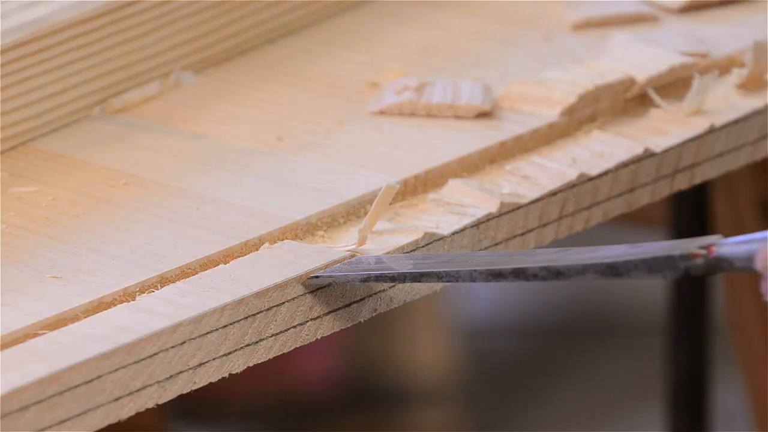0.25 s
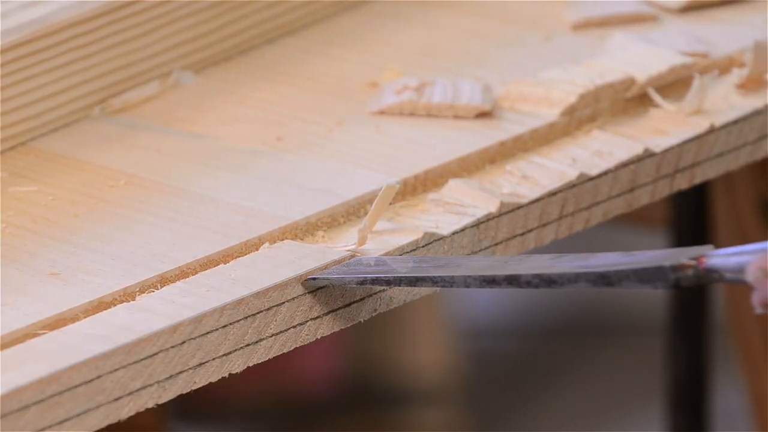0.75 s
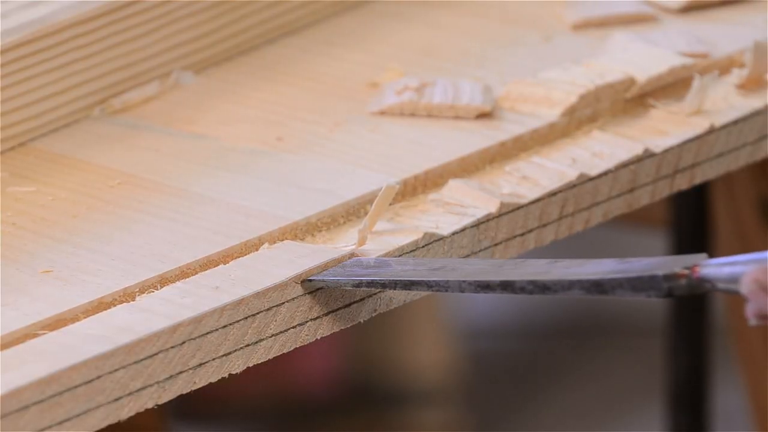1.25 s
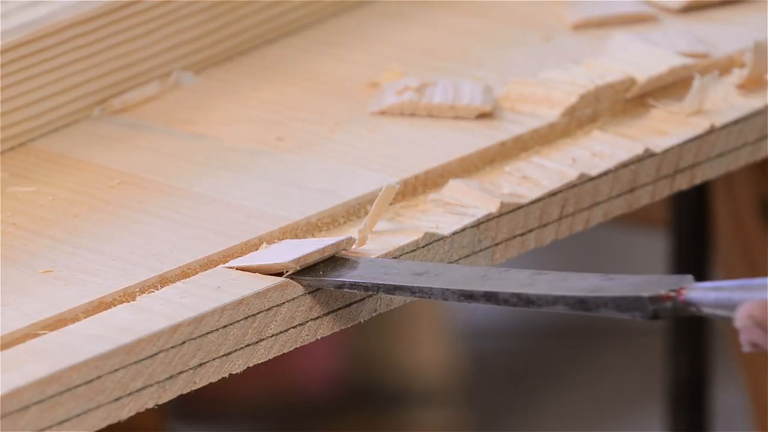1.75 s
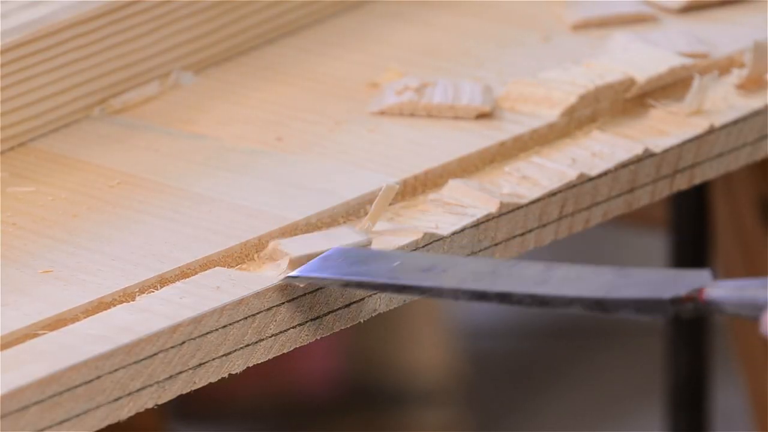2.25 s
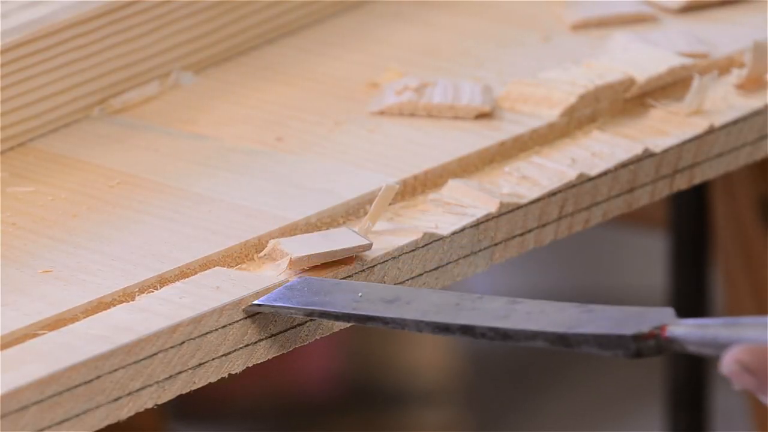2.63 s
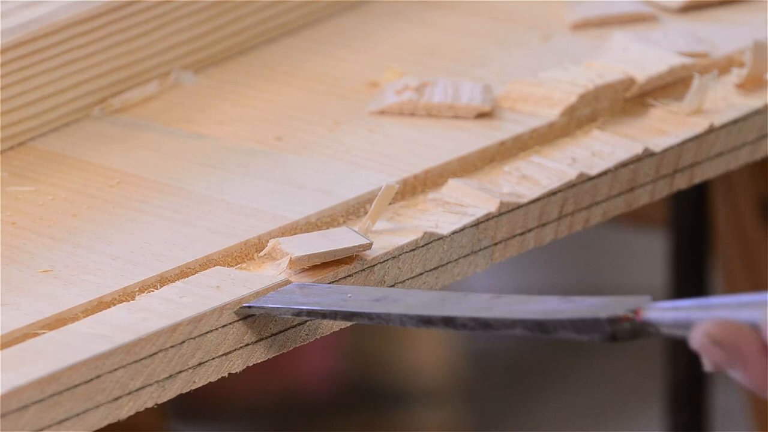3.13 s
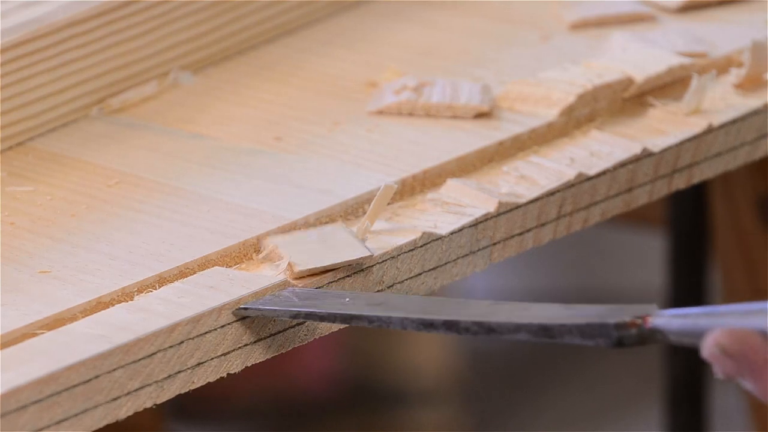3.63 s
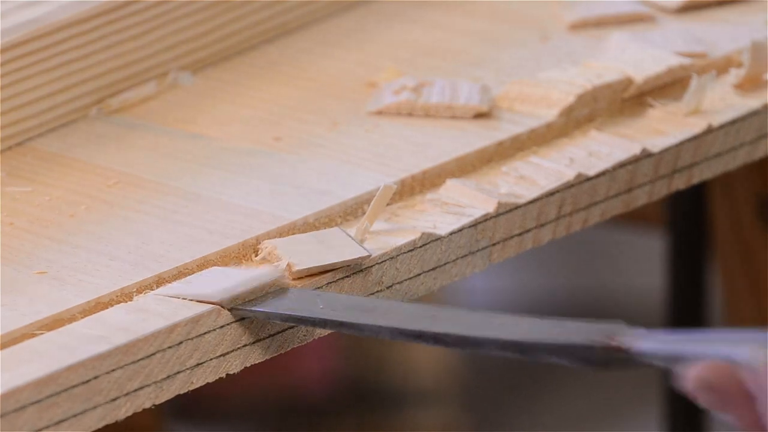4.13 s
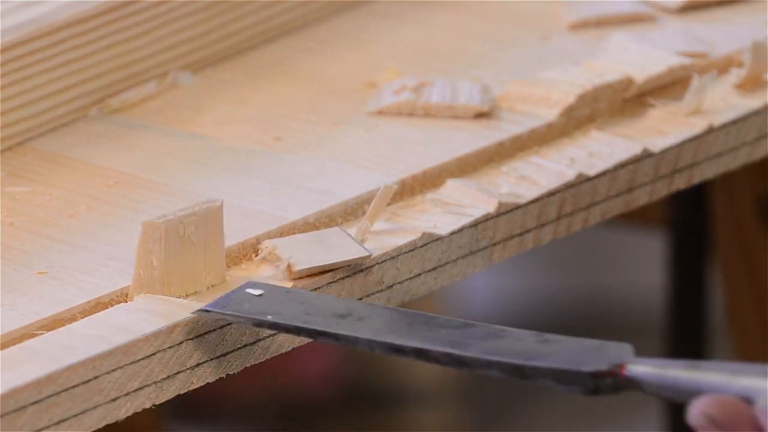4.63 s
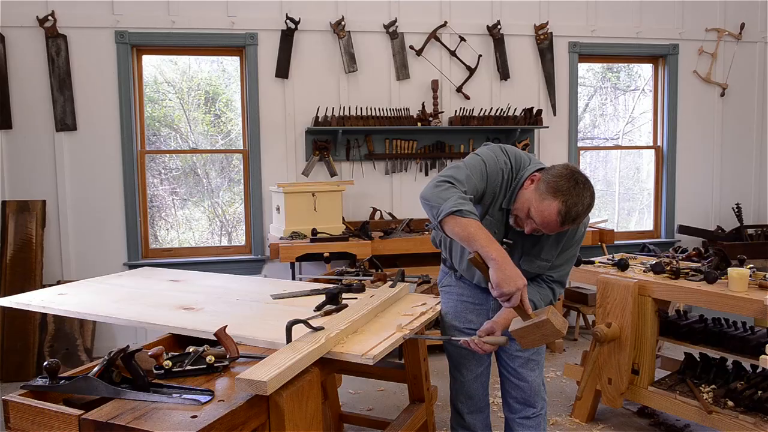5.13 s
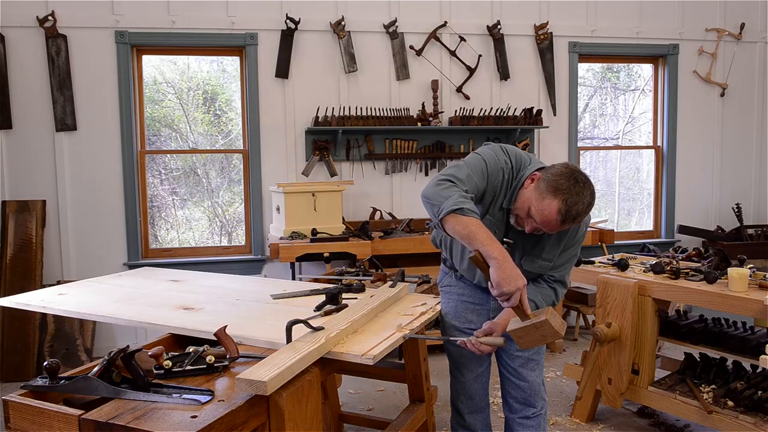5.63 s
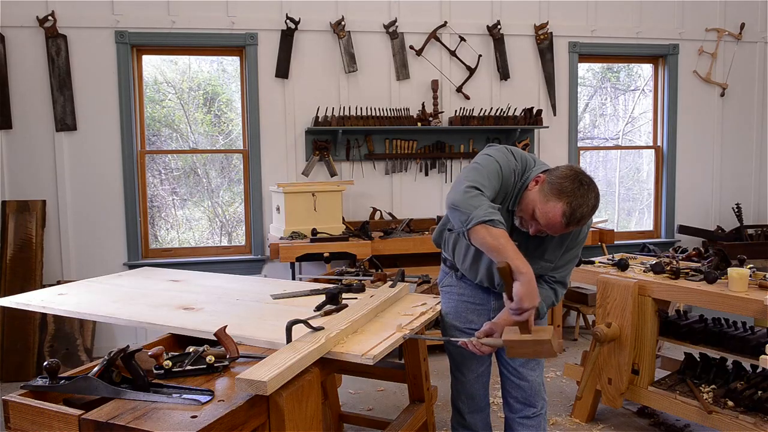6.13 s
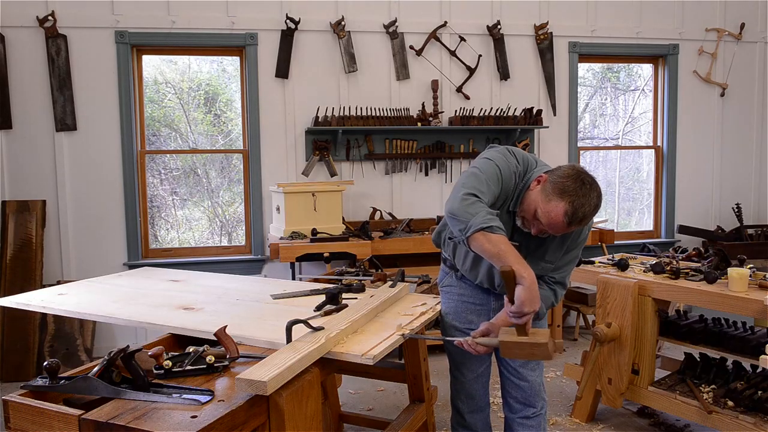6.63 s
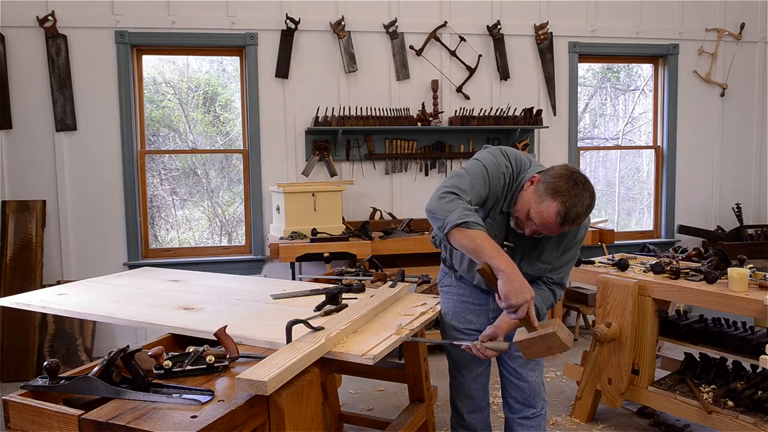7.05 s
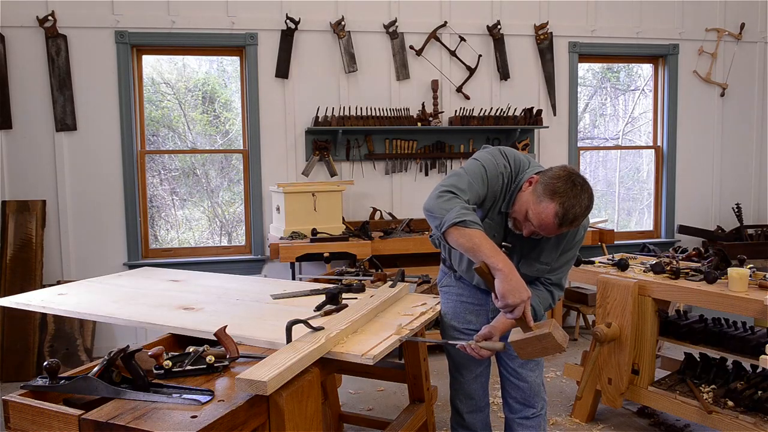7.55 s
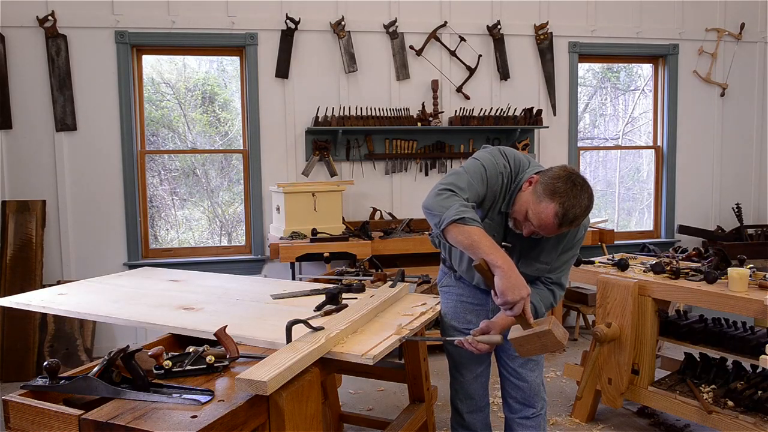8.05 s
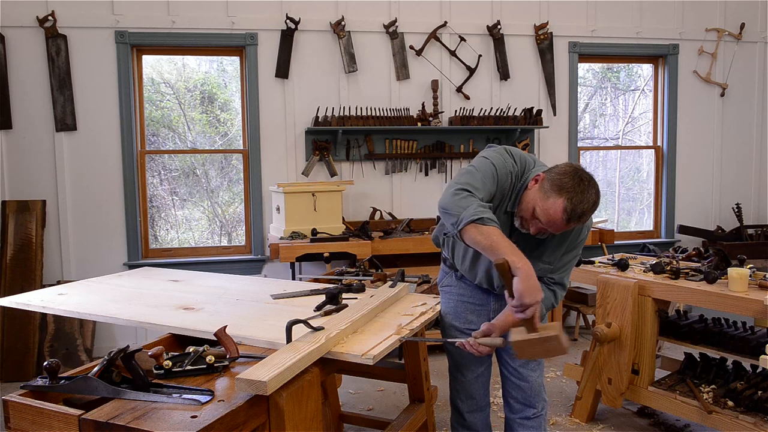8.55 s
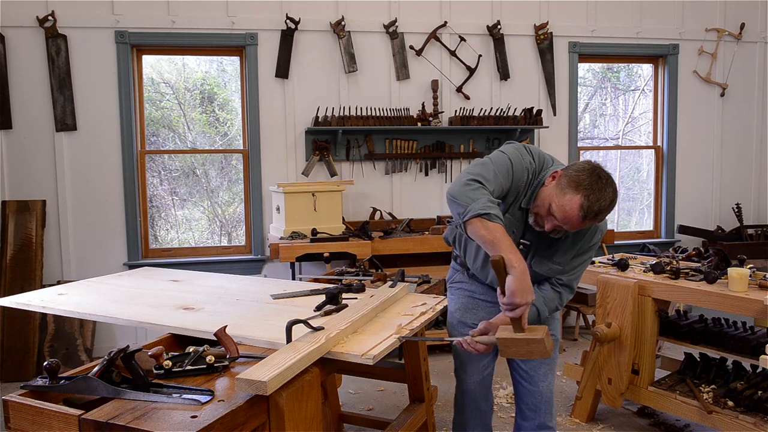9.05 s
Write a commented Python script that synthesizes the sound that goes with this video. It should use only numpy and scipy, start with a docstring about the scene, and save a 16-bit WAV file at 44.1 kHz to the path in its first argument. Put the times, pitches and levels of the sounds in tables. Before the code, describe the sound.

Sharp mallet blows on a chisel echo around a workshop, while the blade scrapes and splits off wood chips between runs.

```python
"""Mallet and chisel in a workshop

A wooden mallet drives a chisel along the edge of a board in runs of blows. Each blow cracks, rings the
board, bench and tools, and echoes round the room; the loudest overload the recorder. Between runs the
blade slides and levers off chips, fibres snap and tear, and sleeves rustle. Lamps hum, and a few gusts
of air buffet the microphone, mostly on the right."""
import sys
import numpy as np
from scipy import signal
from scipy.fft import rfft, irfft
from scipy.io import wavfile

SR = 44100
rng = np.random.default_rng(int(sys.argv[2]) if len(sys.argv) > 2 else 0)


def log_audio(samples):
    """Write samples as a 16-bit WAV file to the path given in sys.argv[1]."""
    # one column per channel
    frames = np.atleast_2d(samples).T
    # limit to full scale, then quantise
    limited = np.clip(frames, -1, 1)
    pcm = np.round(limited * 32767).astype(np.int16)
    wavfile.write(sys.argv[1], SR, pcm)


N = 410130

# Mallet blows and rebounds. Each row: start in seconds, strength in dB, lean towards the steel in dB
# per part, extra board boom in dB, extra mallet-head knock in dB, extra crack in dB, the crack's
# treble tilt in dB, level of tearing fibres in dB.
BLOWS = [(0.4001, -12, -0.5, 1.5, -6.5, -5.5, -8.5, -63), (0.4576, -23.5, 1.5, 0.5, -3, -10, -8.5, -74.5),
         (.7320, -7.5, 0, 0.5, -4, -9.5, 3.5, -52.5), (0.9697, -5, 0, 5, -5, -7, -6.5, -51.5),
         (1.1973, -5, 0.94, 1, -3, -4.5, 2, -50), (1.4309, -8.5, -0.3, -3.5, 1.5, 7.5, 7, -53.5),
         (1.6624, -12, 1.5, -0.5, -5, -2.5, -10.5, -67), (1.8861, -14.5, -2.2, -4, 0, -2, -2, -63),
         (3.6300, -8.5, 1.5, 3.5, -.5, -7, -9.5, -60), (3.9180, -9.5, 1.4, 2, 3, 1, 10.5, -49),
         (4.1730, -13.5, 4, 4.5, 6, -5.5, -18.5, -68), (6.1275, -5.5, 4, 1.5, 3.5, -2, -14, -47.5),
         (6.4098, -9.5, 1, -4, -0.5, 5, 1.5, -48), (6.6374, -18.5, -1.5, -3, 2, 5.5, 5, -64),
         (6.6487, -21, 0, -6, -9, -5, -1, -71), (8.4275, -18, -0.64, 0, -0.5, -12, -2, -68.5),
         (8.7714, -5, 3.5, -2, 7, -4.5, -18, -49.5), (9.0328, -8, 0.2, -7, -5, -11, -9, -82)]
# The tones of the board and bench. Each row: pitch in Hz, level in dB, seconds to fade by 60 dB.
BOARD = [(123, -12.5, 0.054), (167.7, -12, 0.21), (248.1, 1.5, 0.082), (291, -4, 0.063), (336.3, 0.5, 0.11),
         (394, -7.5, 0.17), (429, -7, 0.16)]
# The tones of the chisel's handle, with the same columns.
HANDLE = [(730, 0, 0.055), (814, -1, 0.043), (927.4, -5, 0.05), (1051, -5, .04)]
# The tone colour of a crack. Each row: frequency in Hz, level in dB.
CRACK = [(2000, -6), (3300, -3), (5000, -7.5), (7000, -5.5), (9500, -7.5), (12000, -15), (16000, -14.5)]


def amp(db):
    return 10 ** (np.asarray(db) / 20)


def rms_one(x):
    return x / np.sqrt(np.mean(x ** 2) + 1e-20)


def at_hz(rows, hz, column=1):
    """Reads between a table's rows, with frequency counted in octaves."""
    rows = np.array(rows)
    return np.interp(np.log(np.maximum(hz, 1)), np.log(rows[:, 0]), rows[:, column])


def envelope(spells, rise_db_per_s, fall_db_per_s):
    """Each spell of sound swells in before its start, holds, then dies away."""
    t = np.arange(N) / SR
    return sum(amp(db - rise_db_per_s * np.maximum(start - t, 0)
                   - fall_db_per_s * np.maximum(t - start - length, 0)) for start, length, db in spells)


def clicks(times, sizes):
    out = np.full(N, 1e-18)
    out[np.round(np.asarray(times) * SR).astype(int)] = sizes
    return out


def dying(times, levels_db, fade_s):
    """A loudness curve that jumps at each time, then falls 60 dB in fade_s."""
    return signal.lfilter([1], [1, -amp(-60 / (fade_s * SR))], clicks(times, amp(levels_db)))


def coloured(x, colour):
    """Gives a sound a tone colour; white noise keeps its power."""
    gain = amp(at_hz(colour, np.arange(N // 2 + 1) * SR / N))
    return irfft(rfft(x) * rms_one(gain), N)


def drift(turns_per_s):
    """A curve that wanders at random around zero."""
    knots = rng.standard_normal(int(turns_per_s * N / SR) + 2)
    return np.interp(np.linspace(0, len(knots) - 1, N), np.arange(len(knots)), knots)


def late_left(pair, samples=2):
    return np.array([np.roll(pair[0], samples), pair[1]])


def tilted(make, levels_db, tilt_db):
    """Makes a sound at two levels, tilt_db apart, and blends from one to the other around 6500 Hz."""
    lower, upper = make(levels_db - tilt_db / 2), make(levels_db + tilt_db / 2)
    return lower + signal.lfilter(*signal.butter(1, 6500, "high", fs=SR), upper - lower)


def struck(tones, times, levels_db, contact_ms, spread_db, damping=1):
    """Every hit rings each tone with its own strength; a longer contact lets the ring swell in."""
    out, chance = np.zeros(N), rng.standard_normal((len(times), len(tones)))
    sides = rng.choice([-1, 1], chance.shape)   # the first push depends on where the hit lands
    for k, (hz, db, fade_s) in enumerate(tones):
        turn = np.exp(2j * np.pi * hz / SR)
        decay = amp(-60 * damping / (fade_s * SR))
        swell = np.exp(-1000 / (contact_ms * SR))
        hits = clicks(times, amp(levels_db + db + spread_db * chance[:, k]) * sides[:, k] * damping ** .5)
        feedback = np.convolve([1, -decay * turn], [1, -swell * turn])
        out += signal.lfilter([1 - swell], feedback, hits).imag
    return out


def background():
    """The room rumbles unevenly under the steady hum of the lamps."""
    # The colour of the room's noise. Each row: frequency in Hz, level in dB.
    colour = [(15, -1.5), (25, 6), (60, -2), (126, -9.5), (170, -14.5), (360, -15), (500, -17.5),
              (700, -29.5), (1600, -27.5), (2600, -34.5), (11600, -42.5), (16000, -48)]
    # The lamps' tones. Each row: pitch in Hz, level in dB.
    lamp_tones = [(118.4, -68), (242.2, -80.5), (360.7, -70.5), (479.1, -75.5), (602.9, -84.5),
                  (839.8, -88.5), (1443, -89), (1561, -93.5), (1680, -88.5), (1922, -102.5)]
    noise = rng.standard_normal((3, N))
    rumble = rms_one(coloured(noise[0] + 0.65 * noise[1:], colour)) * amp(-59.5 + 2.5 * drift(6.7))
    t = np.arange(N) / SR
    hum = sum(np.sqrt(2) * amp(db) * np.sin(2 * np.pi * (hz * t + rng.random())) for hz, db in lamp_tones)
    return rumble + hum


def air_buffet():
    """Air hitting the right microphone opening makes lumpy low noise, much weaker on the left."""
    # Gusts of air. Each row: start in seconds, length in seconds, level in dB.
    gusts = [(0.0, 0.013, -28.5), (.3, 0.11, -34), (2.08, 0.14, -28.5)]
    low = signal.sosfilt(signal.butter(2, [15, 85], "band", fs=SR, output="sos"),
                         rng.standard_normal((2, N)))
    loudness = envelope(gusts, rise_db_per_s=248, fall_db_per_s=134)
    return loudness * rms_one(low * amp(2.5 * drift(18))) * amp([[-5.0], [4.5]])


def workshop_echo(x):
    """Countless reflections blend into noise that dies away at its own pace in each band."""
    # The room's echo. Each row: frequency in Hz, seconds to fade by 60 dB, level in dB,
    # how alike left and right are from 0 to 1.
    room = [(59, 0.35, -10.5, .95), (164, 0.82, 1, 1), (290, 1.05, -1, .99), (464, 1.0, -7, .98),
            (1100, 1.096, -3, 0.93), (2160, 1.09, -5, 0.93), (3980, 1.066, -8, 0.15),
            (6500, 0.3, -2.5, 0.18), (9800, 0.21, -5.5, 0.31), (15000, 0.24, -9.5, .3)]
    t = np.arange(2 * SR) / SR
    response = np.zeros((2, len(t)))
    edges_hz = 40 * 2 ** np.arange(0, 9.1, .5)
    for low, high in zip(edges_hz, edges_hz[1:]):
        fade_s, db, alike = (at_hz(room, np.sqrt(low * high), column) for column in (1, 2, 3))
        band = signal.butter(2, [low, high], "band", fs=SR, output="sos")
        mid, side = signal.sosfilt(band, rng.standard_normal((2, len(t))))
        pair = np.sqrt(1 + alike) * mid + np.sqrt(1 - alike) * side * [[1], [-1]]
        response += amp(db - 60 * t / fade_s) * pair
    response *= 1 - np.exp(-t / 0.0027)   # the first reflections build up
    return amp(-33) * signal.fftconvolve(x[None], response, axes=1)[:, :N]


def rubbing(loudness, colour):
    """Rubbing makes dense, uneven grains of noise, partly alike left and right."""
    grains = rng.standard_normal((3, N)) * amp(1.5 * (drift(360) + .7 * drift(44)))
    return loudness * rms_one(coloured(grains[0] + 0.25 * grains[1:], colour))


def rustling_and_tearing():
    """Sleeves and chips rustle, and fibres go on tearing after each blow, with the same crisp noise."""
    # Rustles. Each row: start in seconds, length in seconds, level in dB.
    rustles = [(1.9, 0.036, -61), (2.0, 0.18, -70), (2.72, .08, -76), (3.15, 0.056, -75),
               (3.82, 0.55, -56.5), (5.3, 0.022, -76.5), (5.46, .1, -75.5), (5.85, 0.35, -70),
               (8.07, 0.041, -70.5), (8.68, 0.059, -67.5), (9.1, .03, -76), (9.21, 0.13, -56.5)]
    # Their colour. Each row: frequency in Hz, level in dB.
    colour = [(2500, -16.5), (5000, -1), (8000, -3), (11000, -2), (16000, -10.5)]
    times, tear_db = np.transpose(BLOWS)[[0, 7]]
    tearing = dying(times, tear_db, fade_s=60 / 45)   # falls 45 dB a second
    return rubbing(envelope(rustles, rise_db_per_s=123, fall_db_per_s=156.5) + tearing, colour)


def blade_slides():
    """The blade scrapes softly as it slides over the wood."""
    # Strokes of the blade. Each row: start in seconds, length in seconds, level in dB.
    strokes = [(.03, 0.33, -56.5), (2.45, 0.18, -60), (2.7, 0.19, -55.5), (3.05, 0.21, -64),
               (4.95, 0.28, -59.5), (5.3, 0.18, -69), (5.86, 0.3, -64.5), (7.3, 0.17, -64),
               (8.06, 0.035, -70), (8.28, .12, -67)]
    # The colour of the scrape. Each row: frequency in Hz, level in dB.
    colour = [(120, -41), (200, -5), (244, -3), (294, -11), (853, -15), (1110, -20), (1820, -18),
              (3480, -39.5), (4200, -34.5), (5030, -33), (6200, -43.5), (8000, -43), (10400, -73.5),
              (17600, -120)]
    return rubbing(envelope(strokes, rise_db_per_s=168, fall_db_per_s=200.5), colour)


def chisel_thumps():
    """Laying the chisel against the board gives a soft thump and a short tick from the handle."""
    # Touches of the chisel. Each row: start in seconds, strength in dB.
    touches = [(2.463, -32.5), (2.647, -32.5), (4.935, -43.5), (7.547, -54)]
    times, db = np.transpose(touches)
    thump = struck(BOARD[1:], times, db, contact_ms=4.0, spread_db=1.0, damping=1.6)
    tick = struck(HANDLE, times, db - 13.5, contact_ms=.8, spread_db=1.5, damping=3.3)
    return thump + tick


def crack_noise():
    """Bright noise, mostly alike on both sides, a little late on the left."""
    noise = rng.standard_normal((3, N))
    return late_left(rms_one(coloured(noise[0] + 0.38 * noise[1:], CRACK)), samples=1)


def fibre_snaps():
    """As chips split and are levered off, each fibre cracks and rings briefly at its own pitch."""
    # Snapping fibres. Each row: start in seconds, strength in dB, pitch in Hz.
    snaps = [(1.8902, -14.5, 10300), (1.9024, -37, 5670), (1.9094, -29, 10300), (1.9204, -30, 5730),
             (1.9284, -32, 11800), (1.9395, -26, 8200), (1.9444, -26, 11500), (1.9504, -28, 11500),
             (1.966, -30, 5930), (2.199, -48, 5430), (2.2243, -46, 5700), (2.2784, -48, 8890),
             (2.4624, -54, 5720), (2.5444, -54, 5260), (2.6472, -58, 5840), (2.7484, -51, 6440),
             (2.7994, -53, 5050), (4.1863, -21.5, 5600), (4.1964, -30, 10800), (4.2094, -38, 5770),
             (4.2975, -27.5, 5600), (4.6012, -56, 5130), (4.6272, -49, 5330), (4.6436, -48, 5660),
             (4.68, -59, 5380), (5.0178, -52, 5640), (6.6556, -17.5, 10480), (6.6594, -24, 11800),
             (6.6664, -31, 10400), (6.672, -23, 11700), (6.6804, -36, 11400), (6.8988, -44, 5060),
             (6.9601, -43.5, 6720), (6.987, -44, 5030), (8.7764, -6.5, 5800)]
    times, levels_db, _ = np.transpose(snaps)
    cracks = dying(times, levels_db - 11, fade_s=0.0099) * crack_noise()
    ring_fade_s, ring_width = 0.015, 0.087   # width as a share of the pitch
    rings, t = np.zeros(N + SR), np.arange(SR // 20) / SR
    for start, db, hz in snaps:
        ring = signal.lfilter(*signal.iirpeak(hz, 1 / ring_width, fs=SR), rng.standard_normal(len(t)))
        rings[int(start * SR):][:len(t)] += rms_one(ring) * amp(db - 8.5 - 60 * t / ring_fade_s)
    return (cracks + rings[:N]) * amp([[1.8], [-1.8]])


def floor_shudder():
    """Each blow shakes the floor, a little more when it is harder."""
    # The floorboards' tones. Each row: pitch in Hz, level in dB, seconds to fade by 60 dB.
    floorboards = [(38, -11, 0.62), (58, -1.5, 0.2), (90, -0.5, 0.2)]
    times, strength_db = np.transpose(BLOWS)[:2]
    return struck(floorboards, times, 0.36 * strength_db - 29.5, contact_ms=7.4, spread_db=0)


def wood_and_steel(extra_db, spread_db, blurred):
    """A blow rings the steel at once, then handle and mallet head, and the board last."""
    # The tones of the mallet head and of the chisel's shank and blade.
    # Each row: pitch in Hz, level in dB, seconds to fade by 60 dB.
    head = [(482, 1, 0.046), (580.7, 2, 0.048), (673.8, -7, 0.11)]
    shank = [(1199, -2.5, .03), (1369, -2, 0.025), (1655, 1, 0.012)]
    blade = [(1995, -1, 0.015), (2245, -5.5, 0.037), (2700, -1.5, 0.014), (3142, -5.5, 0.011),
             (4000, -8, 0.0085)]
    # What each part adds to a blow's strength, in dB: board, head, handle, shank, blade.
    parts_db = [-0.3, 1, 0.28, 1.0, -1.7]
    times, strength_db, lean_db, boom_db, knock_db = np.transpose(BLOWS)[:5]
    # Each row: tones, contact in milliseconds, how many times faster they fade if blurred, boost in dB.
    parts = [(BOARD, 5.0, 1.2, boom_db), (head, 2.8, 1.6, knock_db), (HANDLE, 1.8, 1.6, 0),
             (shank, .4, 2.4, 0), (blade, .2, 2.6, 0)]
    ringing = np.zeros(N)
    for k, (tones, contact_ms, damping, boost_db) in enumerate(parts):
        db = strength_db + parts_db[k] + (k - 2) * lean_db + boost_db + extra_db
        ringing += struck(tones, times, db, contact_ms, spread_db, damping if blurred else 1)
    bass_cut = signal.butter(2, 100, "high", fs=SR, output="sos")   # small things give off no deep bass
    return signal.sosfilt(bass_cut, ringing)


def blows_into_room():
    """What feeds the echo: heard from all sides, the tones blur and the crack is a plain, late click."""
    times, strength_db, crack_db, tilt_db = np.transpose(BLOWS)[[0, 1, 5, 6]]
    share_db = -5.5 - 0.13 * strength_db   # a smaller part of a harder blow lingers in the room
    click_db = strength_db + crack_db + share_db + 16.5
    crack = tilted(lambda db: clicks(times + 0.0055, amp(db)), click_db, tilt_db)
    return wood_and_steel(share_db, spread_db=2.16, blurred=True) + coloured(crack, CRACK)


def mallet_blows():
    """The blows heard directly: a sharp crack of steel, louder on the left, and the ringing parts."""
    times, strength_db, crack_db, tilt_db = np.transpose(BLOWS)[[0, 1, 5, 6]]
    noise = crack_noise()
    crack = tilted(lambda db: dying(times, db, fade_s=0.022) * noise, strength_db + crack_db, tilt_db)
    ringing = wood_and_steel(extra_db=0, spread_db=2.1, blurred=False)
    return late_left(ringing * amp([[.3], [-.3]])) + crack * amp([[2.1], [-2.1]])


def scene():
    """Adds up all the sounds; only the blows, thumps and snaps get an echo."""
    levering = chisel_thumps() + fibre_snaps()
    echo = late_left(workshop_echo(blows_into_room() + amp(-8) * levering[0]))
    handling = blade_slides() + rustling_and_tearing()
    return mallet_blows() + floor_shudder() + levering + echo + handling + air_buffet() + background()


def record(dry):
    """The loudest peaks are clipped flat, then the highest treble is cut."""
    treble_cut = signal.cheby2(16, 36, 15860, fs=SR, output="sos")
    return signal.sosfilt(treble_cut, np.clip(dry, -1, 1))


dry = scene()
out = record(dry)
log_audio(out)
```